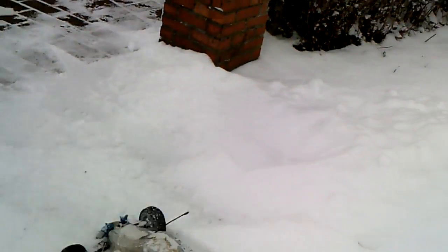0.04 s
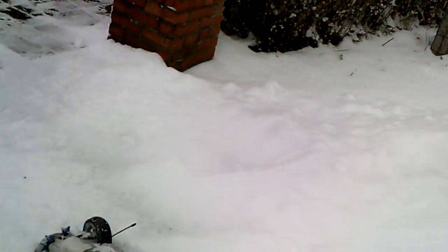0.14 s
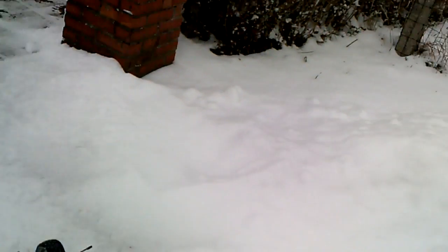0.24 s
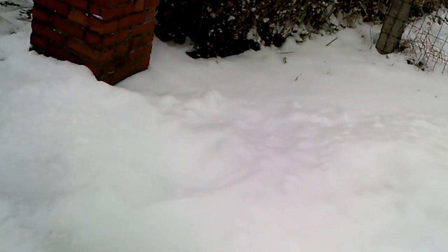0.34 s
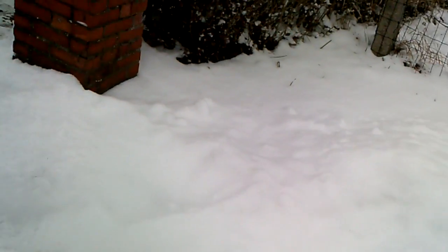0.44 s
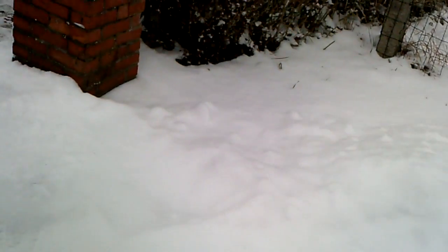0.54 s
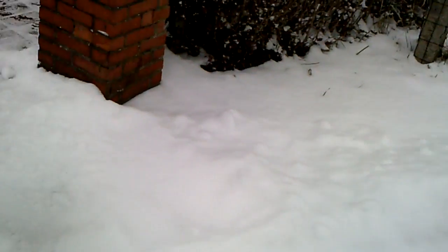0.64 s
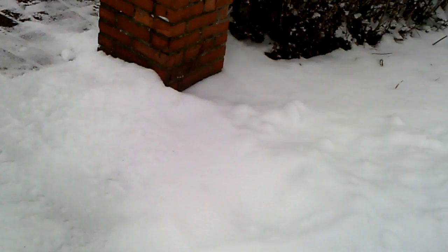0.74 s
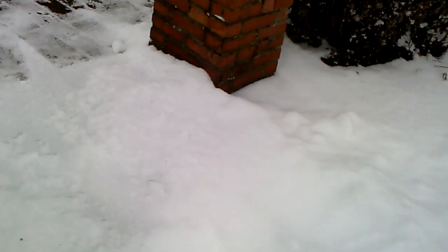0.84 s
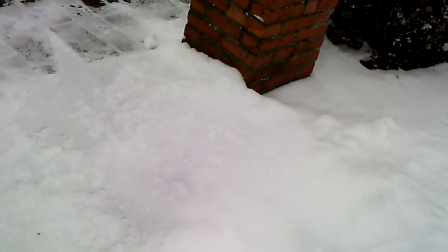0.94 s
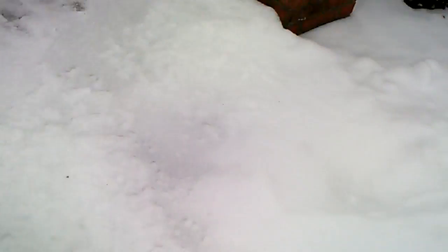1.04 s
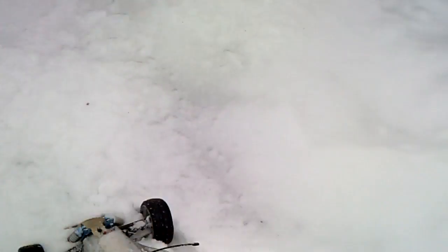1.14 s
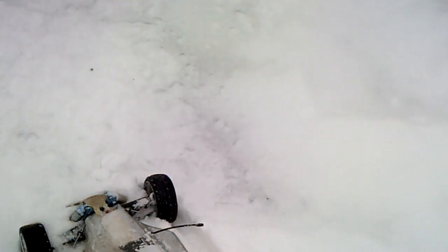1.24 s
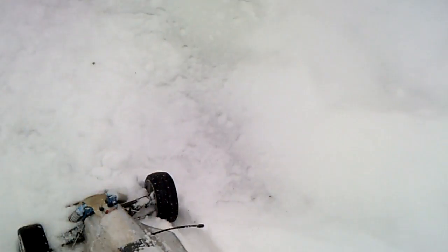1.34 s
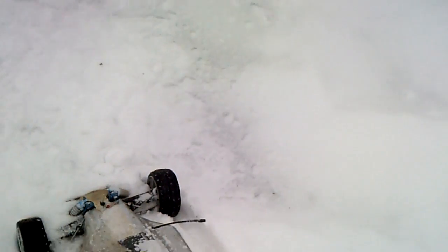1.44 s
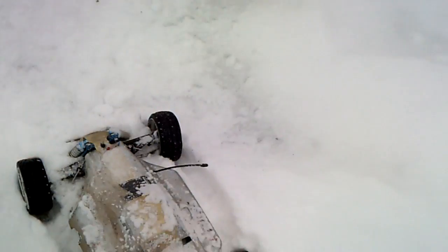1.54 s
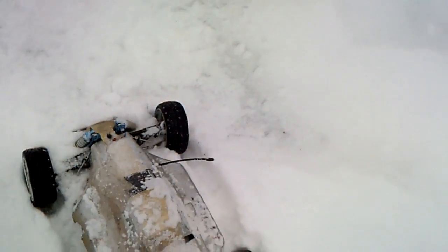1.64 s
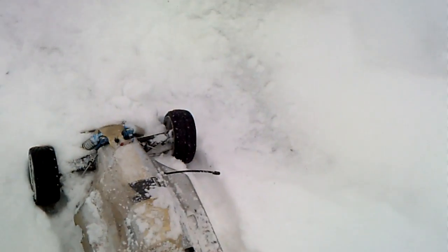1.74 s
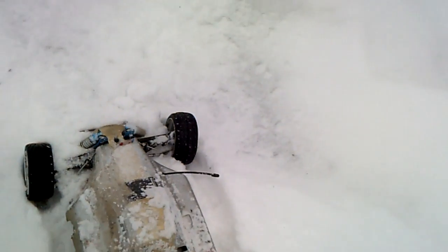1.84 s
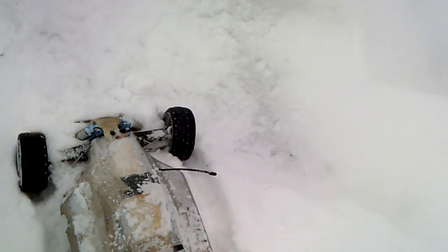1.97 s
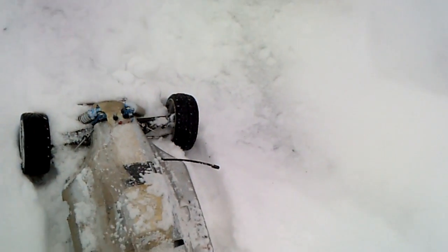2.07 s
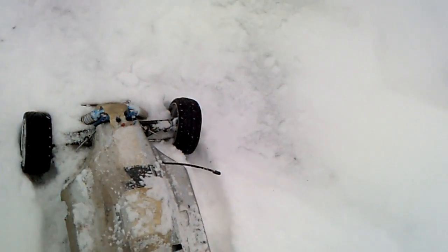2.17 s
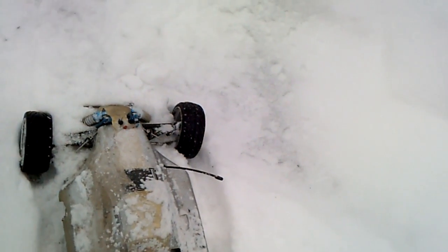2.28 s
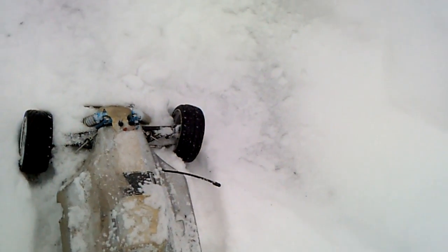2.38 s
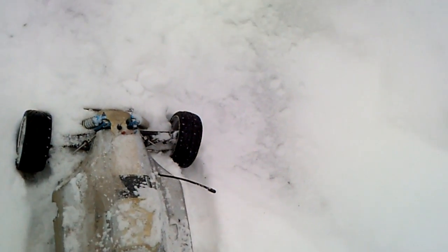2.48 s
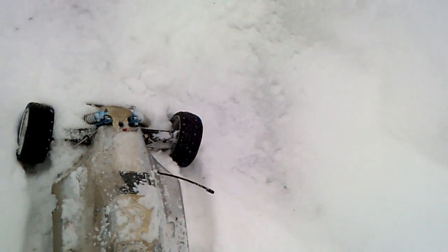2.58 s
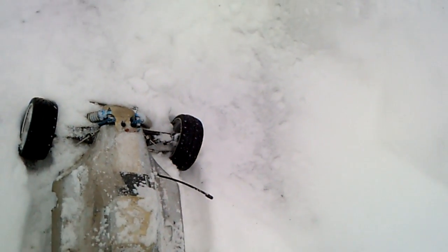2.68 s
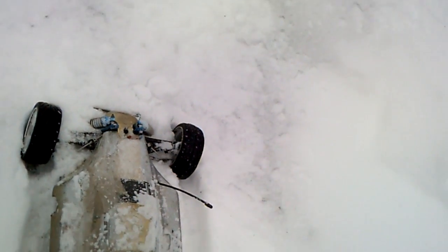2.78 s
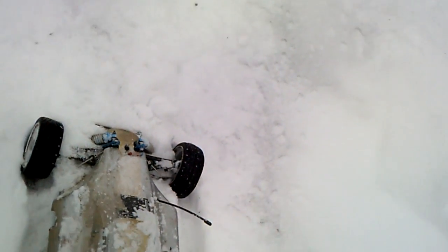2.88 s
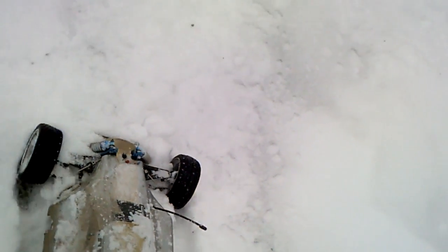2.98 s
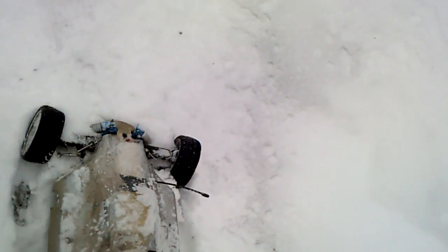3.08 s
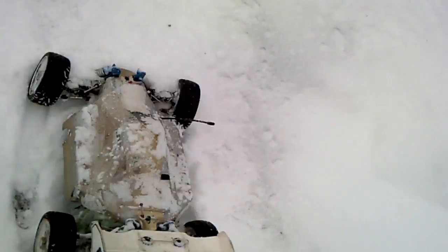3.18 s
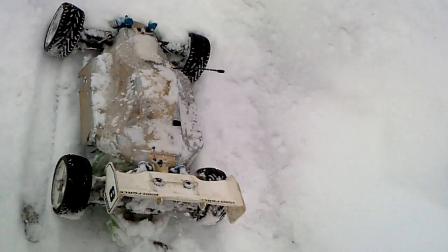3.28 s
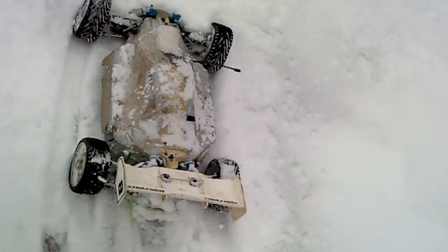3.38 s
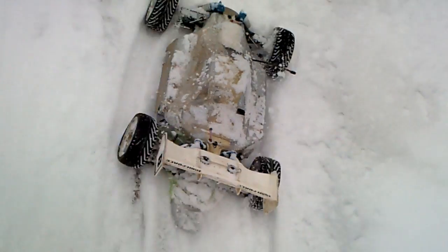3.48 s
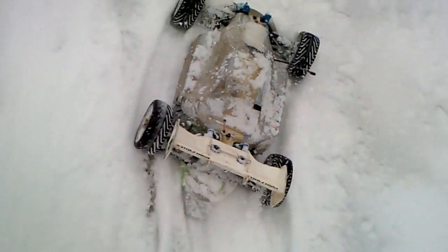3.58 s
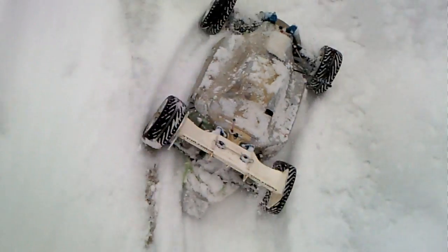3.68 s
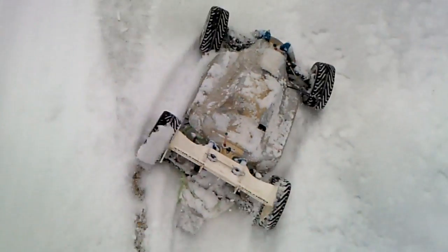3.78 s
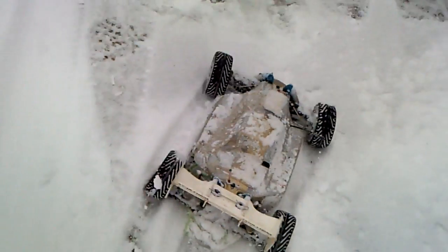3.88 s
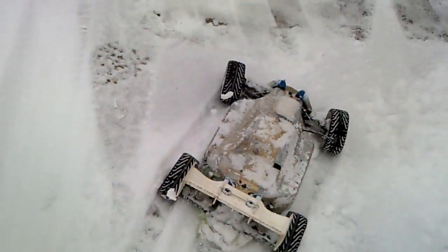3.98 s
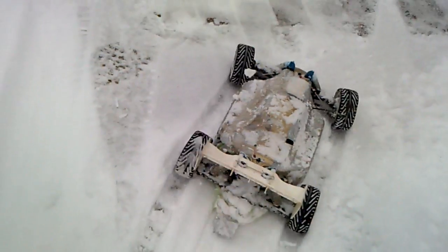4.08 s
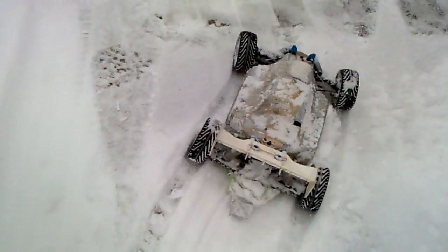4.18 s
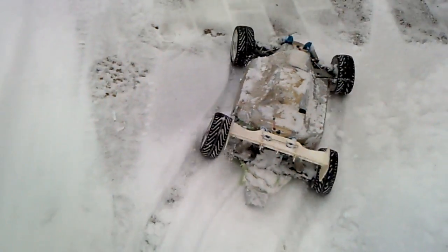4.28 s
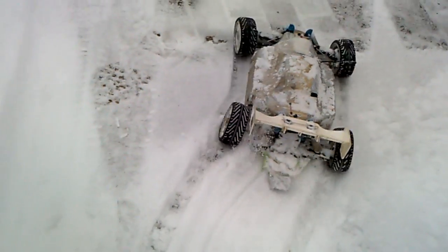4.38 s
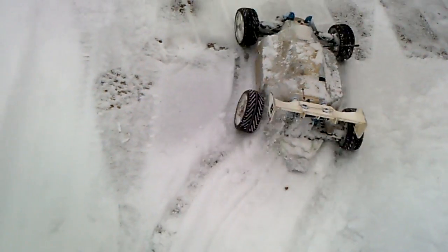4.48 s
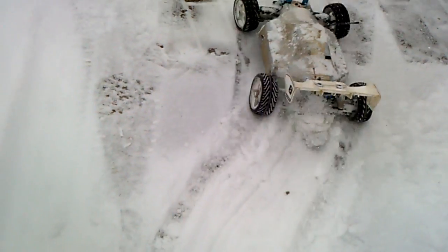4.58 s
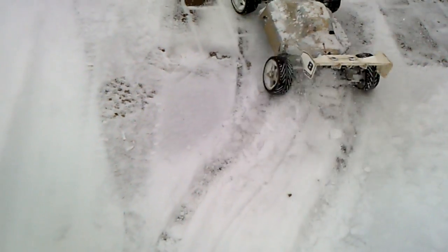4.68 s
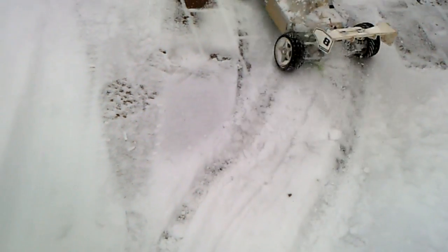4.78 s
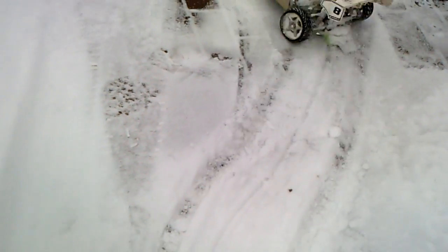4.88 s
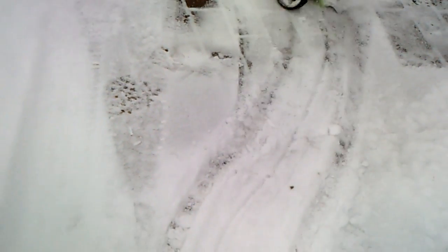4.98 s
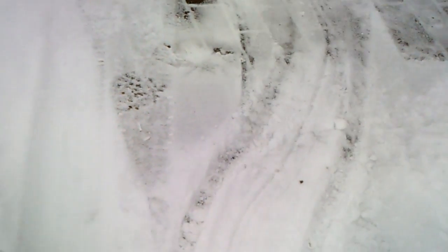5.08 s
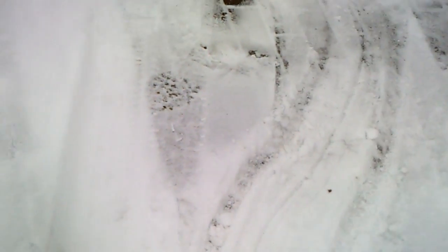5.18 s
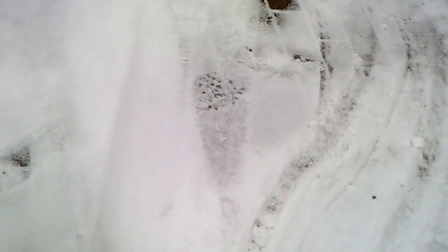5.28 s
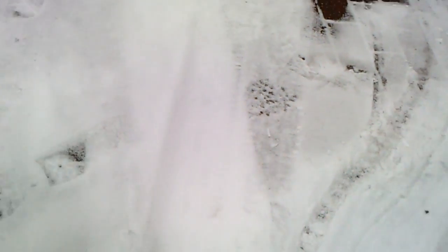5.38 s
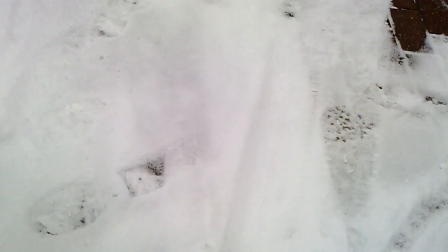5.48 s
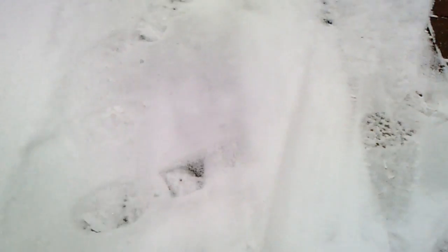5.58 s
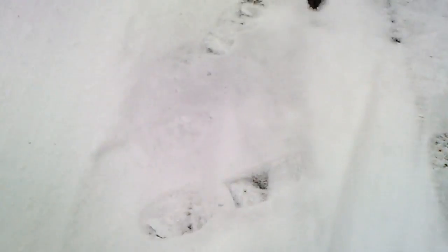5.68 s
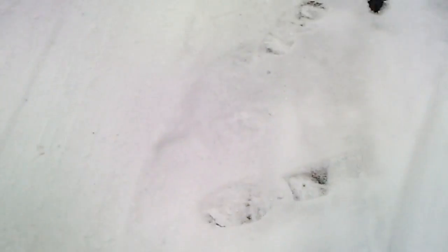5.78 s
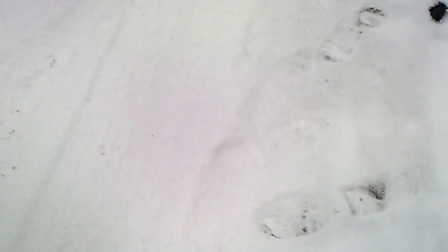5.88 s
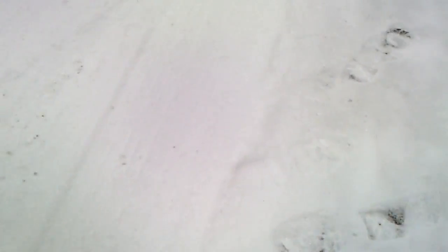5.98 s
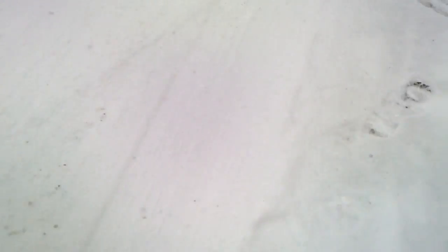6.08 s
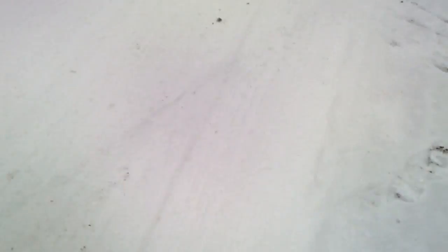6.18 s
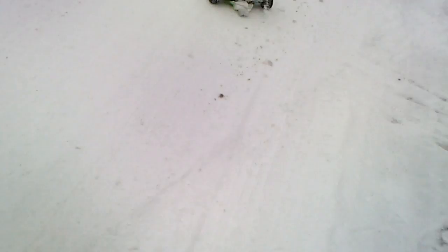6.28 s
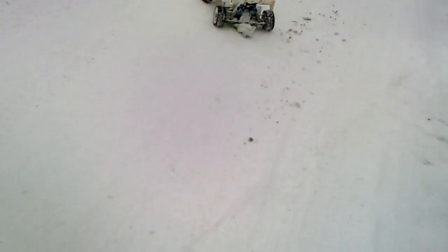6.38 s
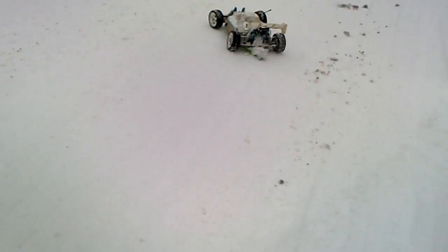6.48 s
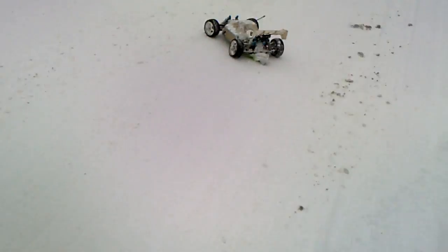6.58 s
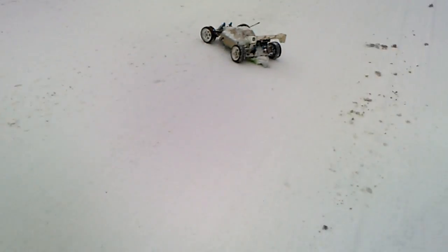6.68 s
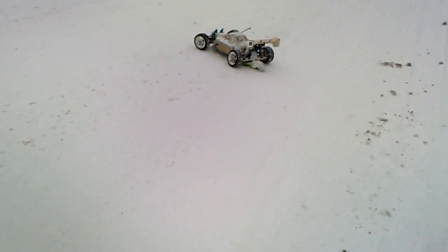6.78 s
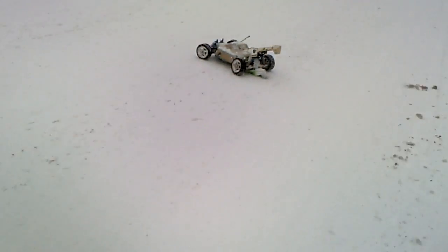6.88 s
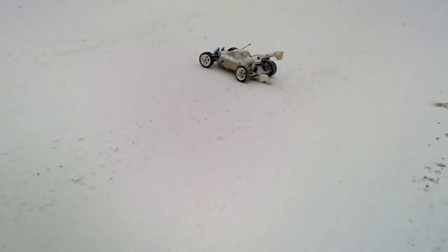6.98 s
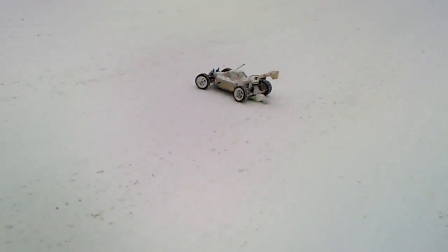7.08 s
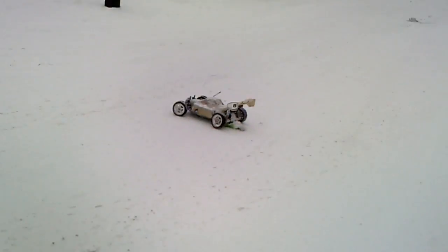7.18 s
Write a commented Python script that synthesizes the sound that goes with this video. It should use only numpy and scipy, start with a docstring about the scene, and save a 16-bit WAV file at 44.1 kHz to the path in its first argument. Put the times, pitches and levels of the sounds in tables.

```python
"""A burst of throttle whines up and dies: an electric radio-controlled buggy in snow, close by. It then only creeps,
before several bursts with spinning wheels as it turns and drives off. The gears whine with motor speed and shake
the plastic chassis, made from wavering tones and random clicks ringing resonances. The tyres churn and spray
snow, made from clumped clicks and a bright band of hiss. Icy ticks and soft knocks stand over a quiet hiss."""
import sys
import numpy as np
from scipy import signal
from scipy.fft import rfft, irfft
from scipy.io import wavfile
from scipy.ndimage import map_coordinates

SR = 44100
rng = np.random.default_rng(int(sys.argv[2]) if len(sys.argv) > 2 else 0)


def master_out(mix):
    """Clip the mix to full scale and print it as 16-bit PCM to the path in sys.argv[1]."""
    frames = np.transpose(np.atleast_2d(mix))
    ceiling = np.clip(frames, -1, 1)
    pcm = np.round(ceiling * 32767).astype(np.int16)
    wavfile.write(sys.argv[1], SR, pcm)


N = 318843
T = np.arange(N) / SR  # time of every sample, in seconds

# partials of shafts and gears: [times_mesh_rate, level_db, blur_hz (mesh rate at which it blurs)]
PARTIALS = [(.27, 0.5, 3580), (0.799, -2, 2800), (1.3, -19, 2500), (3.001, -3, 2400), (4, -12, 2400)]
SHAFT_RATIO = PARTIALS[0][0]  # shaft turns per gear tooth
# resonances of chassis and body shell: [pitch_hz, width_hz, behind_db, turned_away_db]
BODY_SHELL = [(456, 570, -10.5, -33), (646, 132, 3.5, 0.5), (850, 137, 4, -4), (1064, 110, 3.5, 7.5),
              (1360, 280, 4, -2.5), (1505, 184, 3.5, -7), (1773, 126, -2, -2.5), (2194, 116, -10.5, -3),
              (2464, 230, -7, -28), (3060, 230, -13, -10.5), (3830, 540, -23, -39)]
# how far the buggy has turned away: [time_s, turned (0 to 1)]
TURN_AWAY = [(0, 0.47), (.3, 0.4), (3.4, 0.3), (3.64, 0.01), (4.85, 0.07), (5.2, 0.85), (5.7, 0.98),
             (6.5, .78), (7.23, 0.73)]
# squeezes of the throttle, speeds given as gear mesh rate; fall_s is the time taken to move from top to end:
# [start_s, rise_s, hold_s, fall_s, top_hz, end_hz,
# whine_db, octave_db, rotor_db, grind_db, rattle_db, spray_db, letting_go_db (change after the hold)]
SQUEEZES = [(0.011, 0.054, 0.05, 0.19, 2137, 319.8, -36, -39.5, -35.5, -40, -30.5, -41.5, -1.5),
            (3.445, .05, 0.0081, 0.011, 1002, 901, -45.5, -51, -66, -44.5, -34, -43.5, 5.5),
            (3.527, 0.064, 0.022, 0.16, 1880, 630.6, -33, -47, -58, -32.5, -30.5, -40.5, -2),
            (3.869, 0.083, 0.089, 0.11, 1608, 595, -26.5, -36, -65, -65, -33, -39, -2),
            (4.184, .15, 0.052, 0.034, 2561, 2420, -30.5, -45, -42, -55, -28, -39, 0),
            (4.439, 0.089, .004, 0.22, 2980, 2269, -36, -48, -34.5, -50, -28, -34.5, 0.5),
            (4.767, .117, .055, 0.079, 2441, 1246, -33, -39, -42, -51, -29.5, -35.5, 0.5),
            (5.072, 0.072, 0.0057, 0.087, 2099, 1003, -33, -43, -47, -60, -30, -35.5, 0),
            (5.358, .16, 0.0411, 0.022, 3837, 3870, -30, -48, -30, -64, -31, -36.5, -1),
            (5.62, .2, 0.2, .36, 4146, 981.7, -30.5, -55, -40, -58, -29.5, -38.5, -6),
            (6.444, 0.047, 0.084, 0.24, 1510, 1124, -46.5, -51, -58.5, -54.5, -40, -46.5, -0.5),
            (6.874, 0.11, 0.072, 0.095, 1075, 1042, -53, -66, -64, -58, -42, -51, 2)]


def from_db(db):
    """Turn decibels into a gain."""
    return 10 ** (np.asarray(db) / 20)


def rms_one(x):
    """Scale a sound to an average (rms) level of 1."""
    return x / np.sqrt(np.mean(x ** 2) + 1e-20)


def in_time(rows):
    """Draw each column of a table as a curve with a value at every sample."""
    time_s, *columns = np.transpose(rows)
    return [np.interp(T, time_s, column) for column in columns]


def drift(rate_hz):
    """Smooth random wandering with rms 1; a higher rate wanders faster."""
    r = np.exp(-2 * np.pi * rate_hz / SR)
    noise = rng.standard_normal(N + SR)
    # the extra first second lets the filter settle
    return rms_one(signal.lfilter([1], [1, -2 * r, r * r], noise)[SR:])


def follow(x, lag_s):
    """A control that follows its target with inertia."""
    r = np.exp(-1 / (lag_s * SR))
    return x[0] + signal.lfilter([1 - r], [1, -r], x - x[0])


def burst(start_s, t60_s):
    """Envelope of a sudden contact that falls by 60 dB in t60_s."""
    return (T >= start_s) * from_db(-60 * np.clip((T - start_s) / t60_s, 0, 2))


def swells(rows):
    """Envelope of rounded swells that rise faster than they fade."""
    power = 0
    for peak_s, level_db, fade_s in rows:
        half_width_s = np.where(T < peak_s, 0.68 * fade_s, fade_s)  # where the gain has halved
        distance = ((T - peak_s) / half_width_s) ** 2
        power = power + from_db(2 * level_db) * np.exp(-np.minimum(distance * np.log(4), 20))
    return np.sqrt(power)


def grains(per_s, spread_db):
    """Random clicks of uneven size and either sign; rms 1."""
    sizes = from_db(spread_db * np.minimum(rng.exponential(1, N), 4))
    sizes = sizes * rng.choice([-1, 1], N)
    return rms_one(sizes * (rng.random(N) < per_s / SR))


def cut(x, hz, kind, order=2):
    """Keep one range of pitches with a Butterworth filter."""
    return signal.sosfilt(signal.butter(order, hz, kind, fs=SR, output="sos"), x + 1e-18)


def coloured(x, spectrum):
    """Give a noise a smooth spectrum, falling away below its first point; rms 1."""
    points_hz, db = np.transpose(spectrum)
    f = np.maximum(np.fft.rfftfreq(N, 1 / SR), 1)
    skirt = np.minimum(f / points_hz[0], 1) ** 2
    gain = skirt * from_db(np.interp(np.log(f), np.log(points_hz), db))
    return rms_one(irfft(rfft(x) * gain, N))


def resonate(x, modes):
    """Ring side-by-side resonances of alternating sign."""
    out = 0
    for k, (hz, width_hz, db) in enumerate(modes):
        r = np.exp(-np.pi * width_hz / SR)
        gain = (-1) ** k * from_db(db) * (1 - r * r) / 2
        feedback = [1, -2 * r * np.cos(2 * np.pi * hz / SR), r * r]
        out = out + gain * signal.lfilter([1, 0, -1], feedback, x + 1e-18)
    return out


def shiver(x, modes):
    """Loose parts press unevenly, so each resonance swells and fades by itself."""
    return sum((-1) ** k * resonate(x * from_db(2.6 * drift(28)), [mode]) for k, mode in enumerate(modes))


def turning(shape, x, table):
    """Cross-fade from the colour heard from behind to the colour heard once the buggy has turned."""
    turned = np.clip(in_time(TURN_AWAY)[0], 0, 1)
    behind = rms_one(shape(x, [row[:-1] for row in table]))
    away = rms_one(shape(x, [(*row[:-2], row[-1]) for row in table]))
    return (1 - turned) * behind + turned * away


def tone(turns, blur, flutter_db):
    """A partial of a rattling gear train: its phase jitters and its level flutters; rms 1."""
    wave = np.sin(2 * np.pi * turns + blur * drift(96))
    return rms_one(wave * from_db(flutter_db * drift(76)))


def radiated(hz):
    """The car radiates a tone more or less well as it sweeps through the car's resonances."""
    # radiation of the car: [pitch_hz, gain_db]
    radiation = [(500, -4), (620, 7.5), (830, 7.5), (1060, 6), (1210, -5), (1500, 3), (1800, -1),
                 (2100, 0.5), (2550, -8.5), (2950, -12.5), (3400, -7.5), (3950, -2.5), (4700, -10),
                 (8000, -18)]
    points_hz, db = np.transpose(radiation)
    return from_db(np.interp(np.log(hz), np.log(points_hz), db))


def with_ground(x, lag_s, echo_db):
    """Packed snow returns one weak reflection, whose lag wanders as the buggy moves."""
    lag = lag_s * np.exp(0.2086 * drift(0.79))
    return x + from_db(echo_db) * map_coordinates(x, [(T - lag) * SR], order=3)


def background(air_db, hum_db):
    """Still winter air, made as coloured noise, with a faint wavering hum of steady tones."""
    # colour of the air: [pitch_hz, relative_db]
    air_colour = [(20, -1), (130, -12), (250, -7), (450, -8.5), (1100, -6), (2500, -11.5), (8000, -13.5),
                  (14000, -14)]
    # faint hum, before the shared hum_db: [pitch_hz, relative_db]
    hum_tones = [(52.5, -72), (99, -72), (165, -72.5), (231, -74), (8619, -82), (8689, -74)]
    hum = 0
    for hz, db in hum_tones:
        hum = hum + from_db(db) * np.sqrt(2) * np.sin(2 * np.pi * hz * T + drift(2.2))
    air = coloured(rng.standard_normal(N), air_colour)
    return from_db(air_db) * air + from_db(hum_db) * hum


def knocks(knock_db, t60_s, dull_hz):
    """Dull short bumps, made as dying bursts of low noise."""
    # soft knocks, before the shared knock_db: [start_s, relative_db]
    bumps = [(0.762, -42), (0.8384, -40.5), (1.0128, -39.5), (1.095, -37), (1.132, -42.5), (1.379, -35),
             (1.44, -45), (1.48, -48), (2.382, -45.5), (2.971, -42)]
    envelope = sum(from_db(db) * burst(s, t60_s) for s, db in bumps)
    dull_noise = rms_one(cut(rng.standard_normal(N), [300, dull_hz], "band"))
    return from_db(knock_db) * envelope * dull_noise


def ticks(ring_db):
    """Each brittle icy tick is a broad crack and a short crackle that rings high resonances."""
    # icy ticks, the ring before the shared ring_db: [start_s, ring_relative_db, ring_t60_s, crack_db]
    icy_ticks = [(0.2398, -13, 0.0073, -43), (0.744, -19.5, 0.065, -41), (0.941, -18.5, 0.048, -33),
                 (3.189, -18.5, 0.0066, -35), (5.0061, -15.5, 0.0097, -10.5)]
    # resonances of the ice: [pitch_hz, width_hz, level_db]
    ice = [(3500, 3300, -15), (6530, 360, 3.5), (8200, 640, 2), (10300, 1300, -8), (12340, 490, 5.5),
           (13150, 210, 3)]
    crackle_envelope = sum(from_db(db) * burst(s, t60_s) for s, db, t60_s, _ in icy_ticks)
    crack_envelope = sum(from_db(db) * burst(s, 0.0098) for s, _, _, db in icy_ticks)
    crackle = crackle_envelope * rng.standard_normal(N)
    crack = crack_envelope * rng.standard_normal(N)
    return from_db(ring_db) * resonate(crackle, ice) + cut(crack, [2600, 9500], "band")


def creep(clump_db):
    """Snow gives way under slowly rolling tyres with a fine dry hiss."""
    # slow rolls of the tyres: [peak_s, level_db, fade_s]
    rolls = [(.52, -52, 0.07), (.72, -53, 0.096), (1.24, -51.5, 0.1), (1.44, -49, 0.071), (1.71, -40, 0.15),
             (1.98, -53, 0.046), (2.23, -53.5, 0.078), (2.78, -56, 0.061), (3.3, -51, 0.17)]
    # colour of creeping snow: [pitch_hz, relative_db]
    scuff = [(200, -23), (460, -8), (1100, -2.5), (1700, -2.5), (2500, -11.5), (3100, -7), (6800, -10),
             (7700, -6), (9700, -13), (14000, -20)]
    hiss = coloured(grains(14000, 0.75), scuff)
    return swells(rolls) * from_db(clump_db * drift(41)) * hiss


def switching():
    """The speed controller sings thinly on one pitch that trembles slightly while its level comes and goes."""
    # switching tone: [time_s, level_db]
    singing = [(3.4, -88), (3.8, -73), (3.95, -41), (4.15, -58), (4.4, -51), (5.2, -57), (5.5, -72),
               (6.2, -85)]
    level_db = in_time(singing)[0] + 2 * drift(10)
    return from_db(level_db) * np.sqrt(2) * np.sin(2 * np.pi * 5922 * T + 0.31 * drift(30))


def motor_speed():
    """Gear mesh rate in Hz: each row ramps it to a top, holds it, then moves it to an end speed, usually lower."""
    knots = []
    previous_hz = 689.7  # mesh rate before the first squeeze
    for start_s, rise_s, hold_s, fall_s, top_hz, end_hz, *_ in SQUEEZES:
        times_s = start_s + np.cumsum([0, rise_s, hold_s, fall_s])
        knots += zip(times_s, [previous_hz, top_hz, top_hz, end_hz])
        previous_hz = end_hz
    times_s, hz = np.transpose(knots)
    trigger_hz = np.interp(T, np.maximum.accumulate(times_s), hz)
    return follow(trigger_hz, lag_s=.007)


def drive_levels(mesh_hz):
    """Levels in dB of the six drive sounds: most grow with speed and acceleration, and all react to letting go."""
    grip_s = 0.017  # the levels follow the load with this lag
    stall_hz, pickup_hz = 370, 160  # almost silent below the stall, fully heard this much above it
    hard_pull = 15.7  # octaves per second at which the teeth press hard
    squeezes = np.array(SQUEEZES)
    current = np.maximum(np.searchsorted(squeezes[:, 0], T, "right") - 1, 0)  # squeeze at each moment
    start_s, rise_s, hold_s, _, top_hz, _, *levels, letting_go_db = squeezes.T

    released = T > (start_s + rise_s + hold_s)[current]
    slack_db = follow(letting_go_db[current] * released, grip_s)
    age_s = follow(T - start_s[current], grip_s)
    octaves = np.minimum(np.log2(mesh_hz / follow(top_hz[current], grip_s)), 0)  # below top speed
    acceleration = np.maximum(np.gradient(np.log2(mesh_hz)) * SR, 0)
    pull = np.tanh(acceleration / hard_pull)
    running_db = 20 * np.log10(np.clip((mesh_hz - stall_hz) / pickup_hz, 1e-4, 1))
    levels_db = [follow(db[current], grip_s) + running_db for db in levels]
    whine_db, octave_db, rotor_db, grind_db, rattle_db, spray_db = levels_db

    # the load eases through each squeeze, so levels sag by so many dB per second
    tones_ease_db = 2.7 * slack_db - 9.5 * age_s
    sag_db = 5 * age_s
    # factors of octaves are dB per octave; factors of pull are dB under hard acceleration
    return (whine_db + 2 * octaves + 3 * pull + tones_ease_db,
            octave_db + slack_db,
            rotor_db + 22 * octaves + tones_ease_db,
            grind_db + 10 * octaves + 3.5 * pull + slack_db,
            rattle_db + 3 * octaves + 5 * pull + slack_db - sag_db,
            spray_db + 4 * octaves + 3.5 * pull + 0.74 * slack_db - sag_db)


def spray(mesh_hz, clump_db, bright_db, bright_width_hz):
    """Tyres fling snow crystals in clumps, more the faster they spin; a bright hiss sinks as the buggy turns."""
    # colour of the snow spray: [pitch_hz, behind_db, turned_away_db]
    spray_colour = [(1500, 3, -3), (2650, -4, -2), (3400, 2.5, -2), (3970, -2, 1.5), (4200, 1, 3),
                    (5270, 6, -8), (5570, 4, 1), (7180, -1.5, 0.5), (7600, 8, 8.5), (7940, 5.5, 1),
                    (9850, -7, -0.5), (10300, -5, 1.5), (11060, -6.5, -10), (14000, -22, -15.5)]
    crystals = grains(3000 + 4 * mesh_hz, 2.1) * from_db(clump_db * drift(80))
    behind_hz, away_hz = 5160, 4036
    centre_hz = behind_hz + (away_hz - behind_hz) * in_time(TURN_AWAY)[0]
    # slow complex noise, shifted up to the moving centre, makes a narrow band of hiss
    slow_noise = cut(rng.standard_normal(N) + 1j * rng.standard_normal(N), bright_width_hz, "low")
    bright = slow_noise * np.exp(2j * np.pi * np.cumsum(centre_hz) / SR)
    return turning(coloured, crystals, spray_colour) + from_db(bright_db) * rms_one(bright.real)


def jolts(jolt_db, t60_s):
    """Drivetrain jolts and chassis bumps: short blows ring the body shell."""
    # blows, before the shared jolt_db: [start_s, relative_db]
    bumps = [(0.07, -17), (.141, -23), (3.18, -21), (3.4988, -12), (3.552, -13), (3.589, -18), (4.476, -24),
             (5.131, -33), (5.535, -21), (6.195, -22)]
    envelope = sum(from_db(db) * burst(s, t60_s) for s, db in bumps)
    blows = envelope * rng.standard_normal(N)
    modes = [(hz, width_hz, behind_db / 2) for hz, width_hz, behind_db, _ in BODY_SHELL]
    return from_db(jolt_db) * resonate(blows, modes)


def chassis(teeth, mesh_hz, shake_db, partials_db, rattle_db, growl_db):
    """Shaft partials and loose tooth impacts, bunched once a shaft turn, ring the shell."""
    shaft = SHAFT_RATIO * teeth
    partials = 0
    for ratio, db, blur_hz in PARTIALS:
        blur = 0.39 + (mesh_hz / blur_hz) ** 2
        partials = partials + from_db(db) * tone(ratio * teeth, blur, flutter_db=4.5)
    impacts = grains(2600, 2.3) * (1 + 0.55 * np.cos(2 * np.pi * shaft))
    ringing = from_db(partials_db) * turning(resonate, partials, BODY_SHELL)
    rattle = from_db(rattle_db) * turning(shiver, impacts, BODY_SHELL)
    shaken = cut(ringing + rattle, 204, "high")
    up_to_speed = np.clip((mesh_hz - 900) / 700, 0, 1)  # the growl needs a fast shaft
    growl = up_to_speed * tone(shaft, 1.0, flutter_db=3.5)
    return from_db(shake_db) * (shaken + from_db(growl_db) * growl)


def grind(teeth, grind_db):
    """Strained teeth snap past each other in bursts, once a shaft turn, and ring the gearbox."""
    # resonances of the gearbox casing: [pitch_hz, width_hz, level_db]
    casing = [(1860, 590, -2), (2550, 490, 1.5), (3840, 120, 5.5), (5170, 250, 3), (7800, 330, -13)]
    bunching = (1 + np.cos(2 * np.pi * SHAFT_RATIO * teeth)) ** 2
    snaps = grains(3000, 2.1) * bunching
    return from_db(grind_db) * rms_one(shiver(snaps, casing))


def whine(teeth, mesh_hz, whine_db, octave_db, rotor_db, runout, sideband):
    """Gear tones throb with the spur gear and shaft; at high speed the teeth bounce and they smear into a rasp."""
    # the gears sing out briefly: [peak_s, level_db, fade_s]
    surges = [(.03, -25.5, 0.0091), (.237, -29, 0.011), (3.503, -25.5, .01), (3.54, -39, .012),
              (3.738, -29, 0.024), (4.235, -28, .025), (4.485, -29.5, 0.016), (5.08, -26, .016),
              (5.363, -20.5, 0.015)]
    rotor_ratio = .542  # rotor tone, as a share of the mesh rate
    blur = .25 + 1.7 * np.minimum(mesh_hz / 3300, 1) ** 3
    spur_throb = runout * np.sin(2 * np.pi * teeth / 15)
    shaft_throb = sideband * np.sin(2 * np.pi * SHAFT_RATIO * teeth)
    mesh_gain = np.hypot(from_db(whine_db) * radiated(mesh_hz), swells(surges))
    octave_gain = from_db(octave_db) * radiated(2 * mesh_hz)
    rotor_gain = from_db(rotor_db) * radiated(rotor_ratio * mesh_hz)
    mesh = mesh_gain * tone(teeth, blur, flutter_db=2.8)
    octave = octave_gain * tone(2 * teeth, 1.2 * blur, flutter_db=3)
    rotor = rotor_gain * tone(rotor_ratio * teeth, .5 * blur, flutter_db=3)
    return (1 + spur_throb + shaft_throb) * (mesh + octave + rotor)


def scene():
    """Motor speed drives the gears, the chassis and the spray, in open air."""
    # brief swells of chassis rattle: [peak_s, level_db, fade_s]
    rattle_swells = [(.285, -42.5, 0.028), (3.2, -42.5, 0.088), (3.29, -49.5, 0.13), (3.428, -41, 0.028),
                     (4.945, -29, 0.023), (6.1, -38, 0.034), (6.206, -41, 0.033)]
    mesh_hz = motor_speed()
    whine_db, octave_db, rotor_db, grind_db, rattle_db, spray_db = drive_levels(mesh_hz)
    shake_db = 20 * np.log10(np.hypot(from_db(rattle_db), swells(rattle_swells)))
    # count of teeth passed so far; changing grip makes the speed waver
    teeth = np.cumsum(mesh_hz * (1 + 0.01 * drift(45.56))) / SR

    air = background(air_db=-51.2, hum_db=-2)
    small = creep(clump_db=0.8) + ticks(ring_db=-5) + knocks(knock_db=-0.5, t60_s=0.027, dull_hz=1590)
    snow = from_db(spray_db) * spray(mesh_hz, clump_db=2.0, bright_db=-13.5, bright_width_hz=240)
    body = chassis(teeth, mesh_hz, shake_db, partials_db=-11, rattle_db=-2.5, growl_db=-17)
    body = body + jolts(jolt_db=4.5, t60_s=0.0065)
    gears = whine(teeth, mesh_hz, whine_db, octave_db, rotor_db, runout=0.23, sideband=0.14)
    gears = gears + grind(teeth, grind_db)
    buggy = gears + with_ground(body + snow, lag_s=.0018, echo_db=-7.5) + switching()
    return (buggy + small + air)[None]


def record(dry):
    """Cut the treble steeply above 14300 Hz."""
    return signal.sosfilt(signal.ellip(12, .2, 80, 14300, fs=SR, output="sos"), dry)


dry = scene()
out = record(dry)
master_out(out)
```